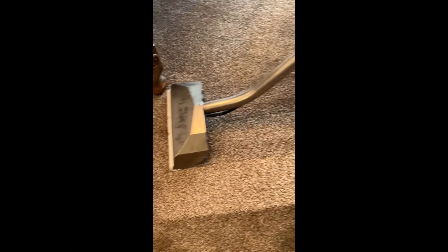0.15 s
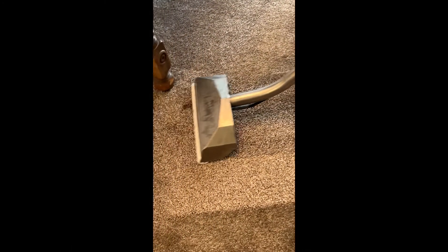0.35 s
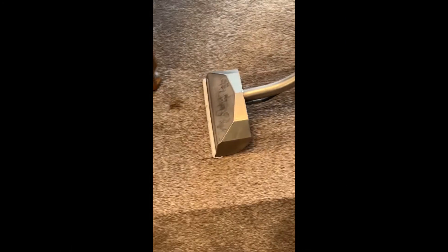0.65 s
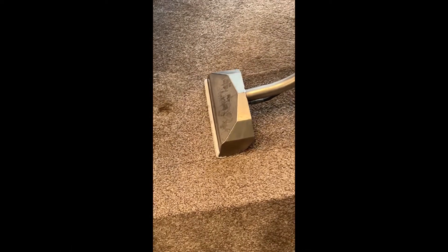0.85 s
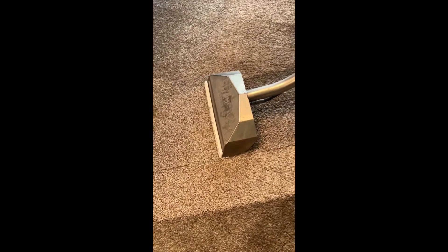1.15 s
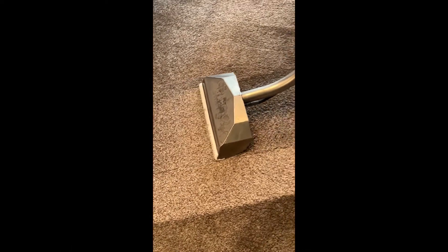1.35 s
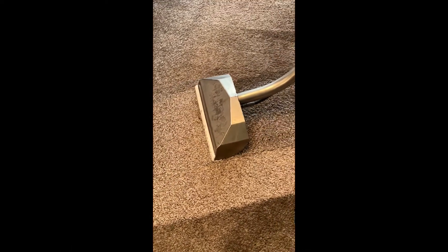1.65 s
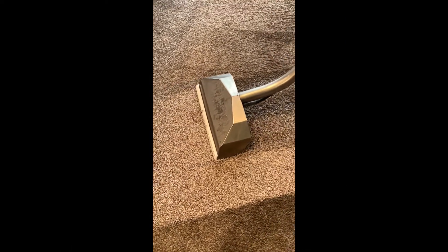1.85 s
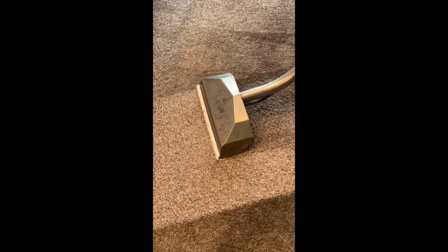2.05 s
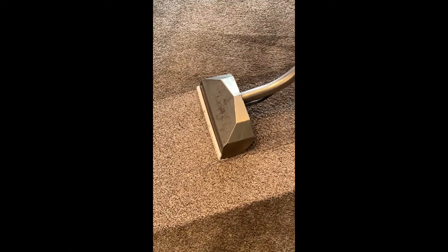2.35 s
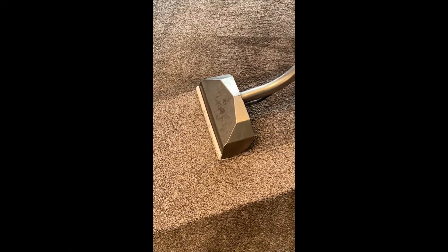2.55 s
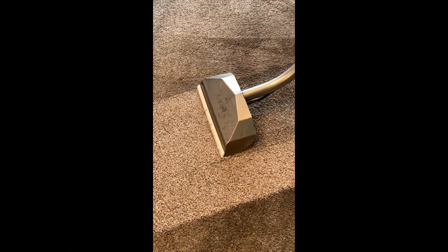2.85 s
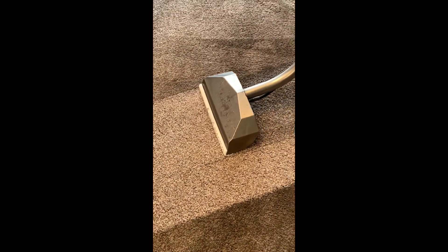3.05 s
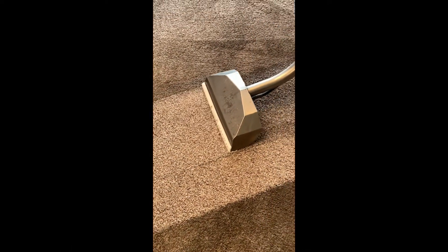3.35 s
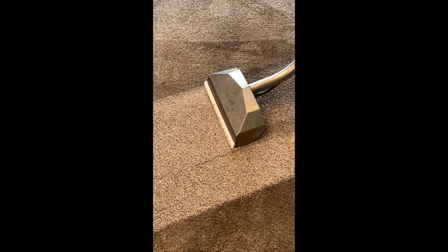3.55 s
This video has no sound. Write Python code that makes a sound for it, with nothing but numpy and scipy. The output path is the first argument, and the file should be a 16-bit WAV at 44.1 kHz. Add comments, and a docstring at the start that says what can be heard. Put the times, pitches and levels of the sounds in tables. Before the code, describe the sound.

Close stereo pickup indoors of a suction wand on carpet: piercing fan whistle and hiss, a quick rough gulp as the stroke turns, a sinking hollow throb, then continuous quieter suction with wavering whine.

```python
"""A fan whistle and hissing air come first, then one roaring gulp as the cleaning stroke turns round.
Indoors, a carpet-cleaning wand is drawn slowly over carpet, close to a stereo microphone.
Air rushing into the slot is shaped noise; the gulp is a cluster of short pushes of duller noise.
The vacuum motor whines on multiples of a base pitch, mostly the seventh, the fan, over a low hum.
A low throb in the hose follows the gulp and sinks in pitch."""
import sys
import numpy as np
from scipy import signal
from scipy.fft import rfft, irfft
from scipy.io import wavfile
from scipy.ndimage import uniform_filter1d

SR = 44100
rng = np.random.default_rng(int(sys.argv[2]) if len(sys.argv) > 2 else 0)


def to_wav(sig):
    """Store sig (one row per channel, or 1-D mono) as 16-bit WAV at the path in sys.argv[1].

    Samples outside -1..1 are clipped; the rate is SR.
    """
    pcm = np.clip(np.atleast_2d(sig), -1, 1) * 32767
    pcm = np.round(pcm).astype(np.int16)
    wavfile.write(sys.argv[1], SR, pcm.T)  # frames by channels


N = 163170
T, HZ = np.arange(N) / SR, np.fft.rfftfreq(N, 1 / SR)


def amp(db):
    """Decibels to gain."""
    return 10 ** (np.asarray(db) / 20)


def evened(x):
    """Scales to rms 1."""
    return x / np.sqrt(np.mean(abs(x) ** 2) + 1e-20)


def curve(points, t):
    """Reads a table over time."""
    return np.interp(t, *np.transpose(points))


def read(points, hz):
    """Reads a table over log frequency."""
    f, value = np.transpose(points)
    return np.interp(np.log(hz + 1), np.log(f + 1), value)


def wander(rate_hz):
    """Complex random motion of rms 1, mostly slower than the rate."""
    z = rng.standard_normal(N) + 1j * rng.standard_normal(N)
    slowness = 1 + (np.fft.fftfreq(N, 1 / SR) / rate_hz) ** 2
    return evened(np.fft.ifft(z / slowness))


def tone(turns, db, envelope):
    """A partial at a random phase, carried by a complex envelope."""
    carrier = np.exp(2j * np.pi * (turns + rng.random()))
    return np.sqrt(2) * amp(db) * (evened(envelope) * carrier).real


# Steady hum of the machine: pitch_hz, level_db, unsteadiness (0-1)
HUM_LINES = [(58.7, -40.5, 0), (109.2, -52.5, 0.95), (223.4, -51, 0.85), (371.6, -46.5, 0.13),
             (736, -57.5, 0.45)]


def hum():
    """Low lines of the machine, each wavering by its own share."""
    out = np.zeros(N)
    for pitch_hz, level_db, loose in HUM_LINES:
        out += tone(pitch_hz * T, level_db, 1 - loose + loose * wander(rate_hz=5.7))
    return out


THROB_S, THROB_LENGTH_S, THROB_DB = .38, .25, -40  # loudest moment, swell half-length, level at its peak
THROB_START_HZ, THROB_HZ, THROB_SAG_S = 270, 135, .1  # pitch sinks from the first towards the second
THROB_WANDER_HZ = 45


def throb():
    """A low, breathy resonance in the hose that swells and fades once, sinking as the slot seals."""
    since_last_push = np.maximum(T - PUSHES[-1][0], 0)
    pitch_hz = THROB_HZ + (THROB_START_HZ - THROB_HZ) * np.exp(-since_last_push / THROB_SAG_S)
    swell = np.exp(-((T - THROB_S) / THROB_LENGTH_S) ** 2)
    return swell * tone(np.cumsum(pitch_hz) / SR, THROB_DB, wander(THROB_WANDER_HZ))


# Base pitch of the motor's whine: time_s, pitch_hz
WHINE_PITCH = [(0, 948.3), (.27, 947.8), (.34, 950.3), (.7, 951.8), (1.3, 948.6), (1.75, 952),
               (2.62, 953.6), (2.8, 949.8), (3.7, 950)]
# Base tone, before its overall gain: time_s, level_db
WHINE_LEVEL = [(0, -41), (.7, -44), (1.8, -41.5), (1.95, -38.5), (2.78, -39), (2.88, -50), (3.18, -49),
               (3.28, -42.5), (3.7, -41)]
# Fan whistle, before its overall gain: time_s, level_db
WHISTLE_LEVEL = [(0, -37), (.05, -28.5), (.11, -27), (.29, -39.5), (.34, -30.5), (.385, -36), (.44, -32),
                 (.475, -43), (.5, -32.5), (.92, -33.5), (.99, -46), (1.12, -38), (1.2, -50), (1.47, -38.5),
                 (1.57, -46), (1.82, -39.5), (1.97, -46), (2.06, -39), (2.14, -44), (2.21, -33),
                 (2.33, -39), (2.37, -32.5), (2.42, -36.5), (2.63, -30), (2.8, -34.5), (2.88, -43),
                 (2.92, -36.5), (3.18, -36.5), (3.32, -45), (3.42, -37), (3.58, -34.5), (3.7, -45)]
# Ninth partial, before its overall gain: time_s, level_db
NINTH_LEVEL = [(0, -49), (1.11, -44), (1.55, -56), (1.72, -45), (2.05, -45), (2.18, -39.5), (2.28, -47),
               (2.68, -42), (2.74, -50), (3.7, -50)]
# Twelfth partial: time_s, level_db
TWELFTH_LEVEL = [(0, -46), (.5, -52), (1.9, -49), (2.25, -44), (2.8, -49), (3.7, -51)]
# Weaker steady partials: multiple of the whine pitch, level_db
LOW_PARTIALS = {2: -57.5, 3: -50, 4: -57.5, 5: -59.5}
# High partials, some on half multiples, before the sizzle is added: multiple of the whine pitch, level_db
HIGH_PARTIALS = {6: -59, 7.5: -59.5, 8: -55.5, 10: -54, 11: -51.5, 12.5: -51.5, 13: -48, 13.5: -51, 14:
                 -49.5, 14.5: -53.5, 15: -46, 16: -54}
# Sizzle of the high partials, followed in part by the top hiss: time_s, added_level_db
SIZZLE_LEVEL = [(0, 9), (.4, 5.5), (.52, 1.5), (1, 0), (2.6, -.5), (3, 1), (3.7, 0)]
FAN_MULTIPLE = 7  # the fan whistles on this multiple of the whine pitch
WHINE_GAIN_DB, WHISTLE_GAIN_DB, NINTH_GAIN_DB = -0.8, 1.4, 1  # overall level added to each curve
JITTER, JITTER_HZ = .0005, 25  # scale of the pitch wander relative to the pitch, and its rate
# Turbulence blurs each partial: shares of its steady part, then rates
FUZZ, WHINE_FUZZ, WHISTLE_FUZZ, NINTH_FUZZ, HIGH_FUZZ = 0.3, 0.2, 0.28, 0.65, .6
FUZZ_HZ, HIGH_FUZZ_HZ = 25.1, 28
SKIRT, SKIRT_HZ = 0.18, 100  # a wider breathy skirt round the fan whistle
FADE, HIGH_FADE, FADE_HZ = .25, .4, 2.5  # slow drift of the other partials


def motor():
    """Whine on whole and half multiples of one base pitch, blurred by turbulence."""
    pitch_hz = curve(WHINE_PITCH, T) * (1 + JITTER * wander(JITTER_HZ).real)
    turns = np.cumsum(pitch_hz) / SR
    out = tone(turns, curve(WHINE_LEVEL, T) + WHINE_GAIN_DB, 1 + WHINE_FUZZ * wander(FUZZ_HZ))
    breath = 1 + WHISTLE_FUZZ * wander(FUZZ_HZ) + SKIRT * wander(SKIRT_HZ)
    out += tone(FAN_MULTIPLE * turns, curve(WHISTLE_LEVEL, T) + WHISTLE_GAIN_DB, breath)
    out += tone(9 * turns, curve(NINTH_LEVEL, T) + NINTH_GAIN_DB, 1 + NINTH_FUZZ * wander(FUZZ_HZ))
    out += tone(12 * turns, curve(TWELFTH_LEVEL, T), 1 + HIGH_FUZZ * wander(HIGH_FUZZ_HZ))
    for multiple, level_db in LOW_PARTIALS.items():
        blur = 1 + FADE * wander(FADE_HZ) + FUZZ * wander(FUZZ_HZ)
        out += tone(multiple * turns, level_db, blur)
    for multiple, level_db in HIGH_PARTIALS.items():
        blur = 1 + HIGH_FADE * wander(FADE_HZ) + HIGH_FUZZ * wander(HIGH_FUZZ_HZ)
        out += tone(multiple * turns, level_db + curve(SIZZLE_LEVEL, T), blur)
    return out


SIZZLE_HZ, SIZZLE_SHARE = 10600, .75


def sizzle_db(t, hz):
    """Added level of the top hiss, reaching only the highest frequencies."""
    reach = 1 / (1 + (SIZZLE_HZ / (hz + 1)) ** 12)
    return SIZZLE_SHARE * curve(SIZZLE_LEVEL, t) * reach


GULP_RISE_DB_PER_S, GULP_FALL_DB_PER_S = 200, 300
LEAK_DB, LEAK_FALL_DB_PER_S, LEAK_HZ = -13.5, 12, 1600  # relative to the push, duller above LEAK_HZ


def opening(t, hz, peak_s, db):
    """The slot opens quickly, mostly shuts again, and leaks dully for a while."""
    before, after = np.maximum(peak_s - t, 0), np.maximum(t - peak_s, 0)
    leak = amp(LEAK_DB - LEAK_FALL_DB_PER_S * after) / np.hypot(1, (hz / LEAK_HZ) ** 2)
    rise = amp(db - GULP_RISE_DB_PER_S * before)
    return rise * np.hypot(amp(-GULP_FALL_DB_PER_S * after), leak)


# Air rushing into the wand: frequency_hz, level_db per Hz
RUSH = [(40, -77), (70, -68), (110, -65.5), (170, -67), (300, -71.5), (450, -67), (620, -68.5), (780, -68),
        (1100, -71.5), (1600, -73.5), (2300, -74), (3000, -71.5), (4000, -76), (5000, -77), (6500, -77),
        (8000, -78.3)]
# Its fine top hiss, before the sizzle level is added: frequency_hz, level_db per Hz
TOP_HISS = [(10000, -80.5), (11000, -77.8), (12300, -71), (13000, -71.2), (15700, -74.5)]
# Roar while the slot is partly open, for a push of 0 dB: frequency_hz, level_db per Hz
GULP_ROAR = [(40, -85), (120, -74), (230, -53), (380, -56), (600, -52), (800, -48.5), (1200, -55.5),
             (1800, -63), (2800, -61), (4000, -72), (6000, -79), (10000, -90)]
# The carpet lets go of the slot in pushes: peak_s, level_db
PUSHES = [(.15, -5.5), (.178, -3.5), (.2, -1), (.222, -2.5), (.255, -8.5), (.285, -7)]
FLUTTER_DB = 2  # the pile flutters in the slot and roughens the gulp
PATCH_DB, SWELL_DB = 0.93, 0.26  # rms unevenness in time and pitch, and of the whole


def suction(size=512):
    """Two unrelated draws of turbulent air: steady rush, plus a gulp that dies away as the slot seals."""
    hop = size // 4
    t = np.arange(N // hop + size // hop)[:, None] * hop / SR
    hz = np.fft.rfftfreq(size, 1 / SR)
    a, b, c, d, patches = rng.standard_normal((5, len(t), len(hz)))
    patches = uniform_filter1d(patches, size=24, axis=0)  # smooth over time
    patches = evened(uniform_filter1d(patches, size=7, axis=1))  # and over frequency
    flutter = amp(FLUTTER_DB * rng.standard_normal(t.shape))
    pushes = np.sqrt(sum(opening(t, hz, *push) ** 2 for push in PUSHES))
    gulp = pushes * amp(read(GULP_ROAR, hz)) * flutter
    rush = amp(read(RUSH + TOP_HISS, hz) + sizzle_db(t, hz))
    swell = np.interp(t, T, evened(wander(rate_hz=18).real))
    level = np.hypot(rush, gulp) * amp(PATCH_DB * patches + SWELL_DB * swell)
    # the root turns levels per Hz into sizes of the transform bins
    z = np.array([a + 1j * b, c + 1j * d]) * level * np.sqrt(3 * SR / (2 * size))
    return signal.istft(z.transpose(0, 2, 1), nperseg=size, noverlap=size - hop)[1][:, :N]


# Likeness of the air noise on the left and right: frequency_hz, likeness (0-1)
STEREO_LIKENESS = [(250, 1), (450, .94), (740, .84), (1300, .87), (1650, 1), (4500, 1), (5000, .8),
                   (5700, 1), (8100, 1), (8700, .62), (10700, .62), (12200, .85), (12900, 1)]
# Left-right balance of the stereo sound: frequency_hz, left_minus_right_db
STEREO_BALANCE = [(200, 0), (450, -1.5), (740, -5), (1250, -5), (1700, 0)]
# Left-right phase of the stereo sound: frequency_hz, left_lead_rad
STEREO_LEAD = [(300, 0), (650, -.35), (1100, 0), (4570, 0), (5040, -3.14), (5650, -6.283), (8200, -6.283),
               (8530, -7.2), (10500, -8.1), (12000, -8.8), (12800, -9.425)]


def scene():
    """The diffuse air noise differs between left and right; everything shares their balance and phase."""
    one, other = rfft(suction())
    same = np.clip(read(STEREO_LIKENESS, HZ), 0, 1)
    sides = np.array([[1], [-1]])  # left, right
    shared_air = one * np.sqrt((1 + same) / 2)
    opposed_air = sides * other * np.sqrt((1 - same) / 2)
    both = rfft(motor() + hum() + throb()) + shared_air + opposed_air
    balance = amp(sides * read(STEREO_BALANCE, HZ) / 2)
    phase = np.exp(1j * sides * read(STEREO_LEAD, HZ) / 2)
    return irfft(both * balance * phase, N)


LOW_CUT_HZ, EDGE_HZ = 39.5, 15750


def record(dry):
    """The microphone's low cut and the recorder's band limit."""
    low_cut = signal.butter(N=5, Wn=LOW_CUT_HZ, btype="high", fs=SR, output="sos")
    band_limit = signal.firwin(1023, EDGE_HZ, window=("kaiser", 9), fs=SR)
    return signal.oaconvolve(signal.sosfilt(low_cut, dry), band_limit[None], "same")


dry = scene()
out = record(dry)
to_wav(out)
```